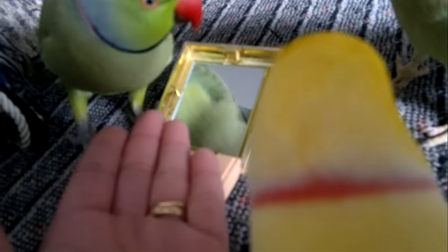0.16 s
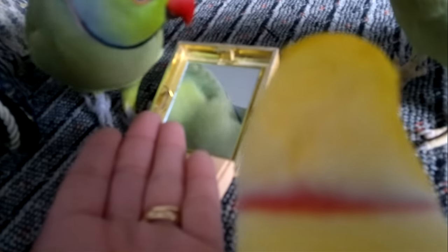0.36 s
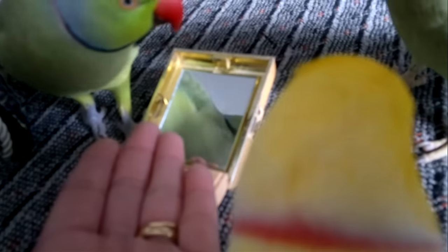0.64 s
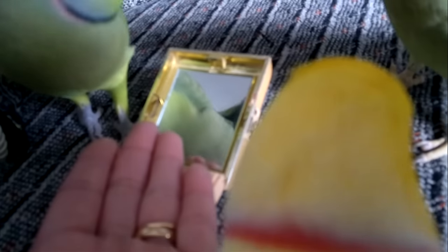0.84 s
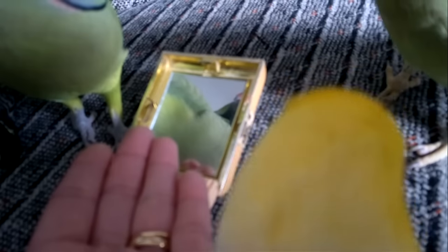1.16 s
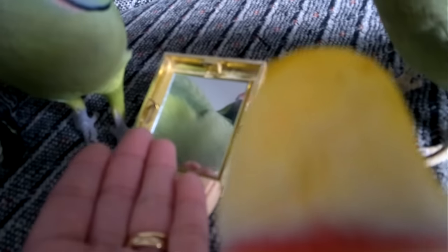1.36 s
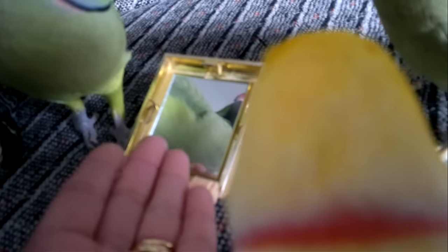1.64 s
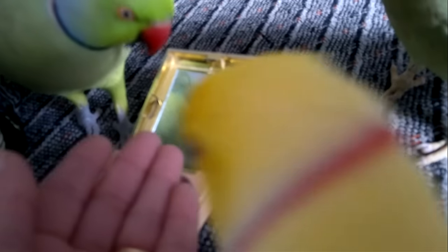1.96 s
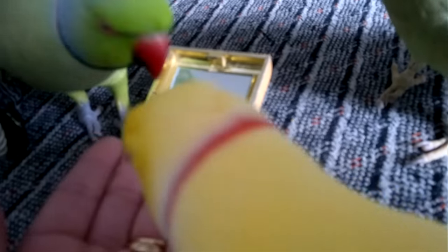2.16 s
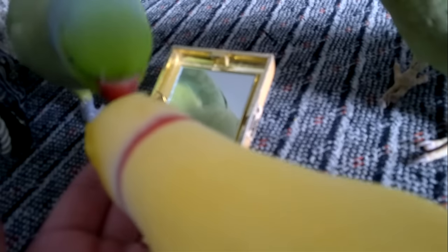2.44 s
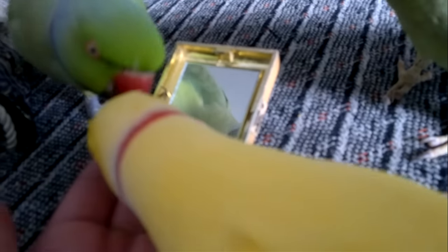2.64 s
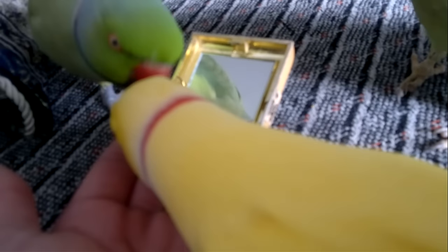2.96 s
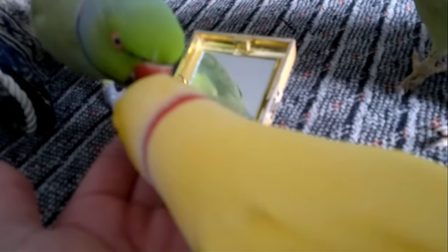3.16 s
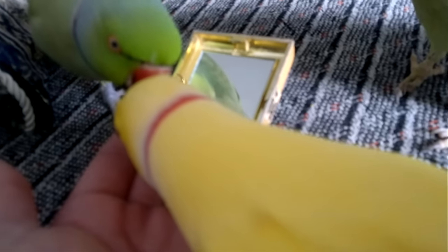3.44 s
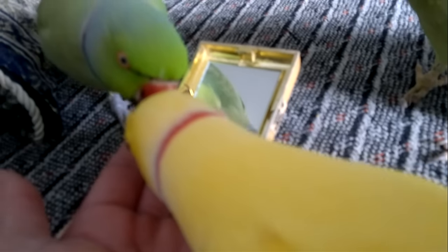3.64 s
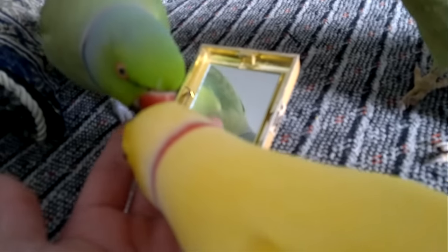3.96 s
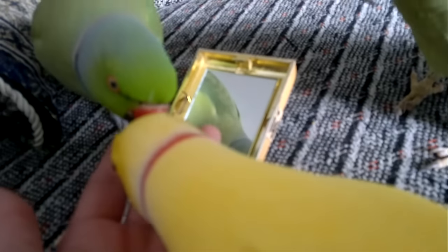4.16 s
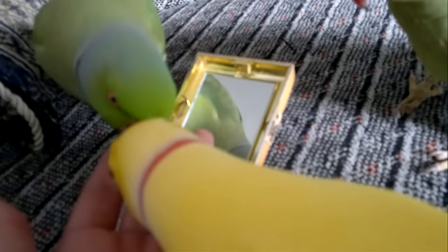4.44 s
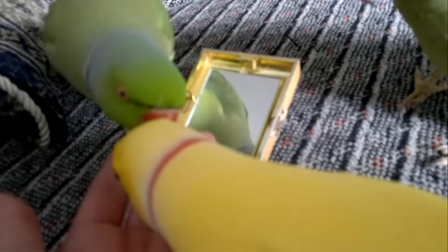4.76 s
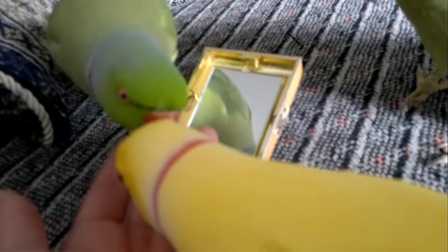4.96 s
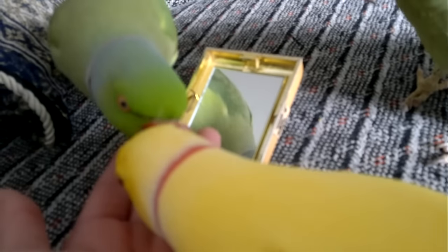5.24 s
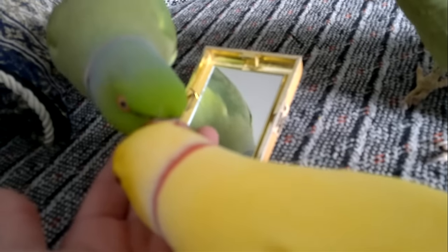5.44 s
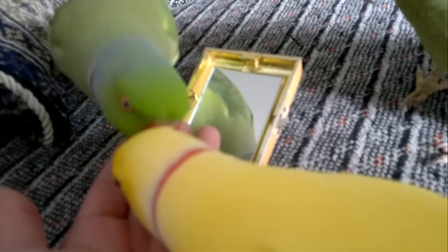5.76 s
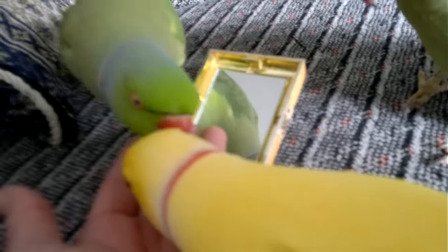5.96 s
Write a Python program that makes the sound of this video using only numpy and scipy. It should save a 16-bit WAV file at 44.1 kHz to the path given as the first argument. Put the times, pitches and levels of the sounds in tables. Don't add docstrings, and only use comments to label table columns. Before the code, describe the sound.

A quiet small carpeted room, heard closely in stereo, with low house hum, soft hiss and slight feather rustle, most noticeable around 0.3 s. From 0.5 to 2.5 s come very faint beak pecks, soft muffled taps and tiny throat blips; a thin, brief rising chirp at about 2600 Hz sounds further off at 1.4 s. A clear, sharp peck lands at 2.64 s. From 2.86 s a parrot near the left side clacks steadily, roughly every 0.22 s: each clack is a fast rattling flutter of tiny pulses, hollow and woody around 2 to 3 kHz, closing about 10 to 25 ms later in a snap, with bright dry crackle. Small ticks and scrapes fill gaps from 3.9 s, with a knock against the phone at 4.8 s. After 5.5 s the clacks are weaker and more muffled as the bird ducks behind a hand, the last faint at 6.07 s.

```python
import sys
import numpy as np
from scipy import signal
from scipy.fft import rfft, irfft, next_fast_len
from scipy.io import wavfile
from scipy.ndimage import uniform_filter1d, minimum_filter1d

SR = 44100
rng = np.random.default_rng(int(sys.argv[2]) if len(sys.argv) > 2 else 0)


def nominal_scale(level):
    x = np.asarray(level, float) / 20
    return 10 ** x


def store_pcm(level_fs):
    pcm = np.round(np.clip(level_fs, -1, 1) * 32767).astype(np.int16)
    wavfile.write(sys.argv[1], SR, np.atleast_2d(pcm).T)


N = 268701
LEAN_IN_S = 2.75
DUCK_S = 5.5

# frequency_hz, level_db
HUM_SPECTRUM = [(12, -37), (20, -0.5), (70, 1.5), (134, -8.5), (274, -11), (300, -18.5), (390, -34.5),
                (660, -120)]
# frequency_hz, level_db
SHUFFLE_SPECTRUM = [(88, -62.5), (180, -12.5), (270, -5), (360, -9), (700, -13), (1370, -22.5), (3500, -32),
                    (5500, -120)]
# frequency_hz, level_db
RUSTLE_SPECTRUM = [(1800, -16), (3000, -4), (5000, -2.5), (8000, -1), (11000, -3.5), (13500, -14),
                   (16000, -23)]
# frequency_hz, level_db
HISS_SPECTRUM = [(120, -37.5), (250, -14.5), (700, -2.5), (1500, -5.5), (2800, -11), (5000, -16),
                 (8000, -31), (16000, -40)]
# time_s, level_db
STIR_LEVEL = [(0, -64), (.17, -62), (.29, -54.5), (.44, -68.5), (.8, -75.5), (1.15, -68), (1.42, -76.5),
              (1.56, -70.5), (1.7, -74.5), (2.6, -77), (2.898, -71.5), (3.499, -82), (3.8, -79.5),
              (4.7, -74), (5.07, -81.5), (5.41, -79), (6.09, -72)]
# start_s, level_db, cavity_hz, knock_relative_db
LIGHT_PECKS = [(0.4846, -69.5, 2080, 14.5), (1.0012, -59, 2900, 1), (1.1935, -53, 2280, -19),
               (1.55, -38, 2250, -7), (2.1526, -70, 1910, -15), (2.1708, -41.5, 2480, -1),
               (2.348, -55.5, 2430, -8), (2.4755, -40, 2700, -2.7), (2.4809, -41.5, 2690, -5.5),
               (2.63, -44, 3130, -28.5), (2.6436, -16.5, 2577, -15), (2.6444, -25, 3340, -11),
               (2.7056, -43, 2400, -13), (2.743, -60.5, 2040, 2)]
# start_s, level_db, cavity_hz, knock_relative_db
RESET_TICKS = [(2.8278, -29.5, 2020, -7), (2.9828, -55.5, 2360, -21), (3.9507, -24.5, 2570, 0),
               (4.0402, -25, 2300, -13.5), (4.276, -30.5, 2010, -8.5), (4.3034, -23, 1910, -18.5),
               (4.4039, -25.5, 3640, -20), (4.418, -28, 3600, -9), (4.5224, -36, 2370, -4.5),
               (4.5551, -22, 2040, -13.5), (4.6296, -24, 2510, -2), (4.778, -44, 2270, 2.5),
               (4.7866, -27, 2240, -5.7), (4.8146, -25.5, 2145, -16.5), (4.8544, -14.5, 2750, -14.5),
               (5.0001, -30, 2204, -20), (5.0076, -25, 2250, -16), (5.0272, -25, 2050, -16),
               (5.2407, -39.5, 2190, -9.5), (5.4521, -50.5, 2240, 7), (5.5862, -29.5, 3100, -28.5),
               (5.7384, -49.5, 2590, -5)]
# start_s, start_to_snap_ms, first_db, middle_db, snap_db
BEAK_CLACKS = [(2.860, 22.7, -3, -25, -10), (3.059, 25.8, -2.5, -10, -3.5), (3.267, 20, -2.5, 2, 3.5),
               (3.478, 24.2, -8, 2, 0.5), (3.712, 13.6, -5.5, -6.5, 0.5), (3.927, 12.44, -6, -9.5, -1),
               (4.1504, 9.3, -13, -24, 3.5), (4.37, 12.1, -7.5, -13.5, -4.5), (4.602, 15.1, -4, -10.5, 0),
               (4.831, 12, -5.5, -3, -3), (5.0657, 14.5, -7, -10, -1.5), (5.297, 19.4, -10, 2, -3),
               (5.557, 13, -13, -27, -29.5), (5.8261, 7, -13.5, -29.5, -27),
               (6.073, 14.3, -26.5, -41.5, -33)]
# time_s, speed_hz_per_ms
BEAK_OPENING = [(3.9, 43), (4.2, 13), (5.1, 12.5), (5.3, 21)]
# time_s, resonance_hz, swell_db
THROAT_TUNING = [(2.7, 920, 0), (2.85, 640, 4.5), (3.5, 560, 3.5), (3.95, 580, 6.5), (4.2, 640, 2.5),
                 (5.1, 700, 1.5), (5.3, 640, 9), (5.55, 1314, 5.5), (5.82, 1619, 8)]
# time_s, centre_hz, level_db, lower_band_relative_db
CRACKLE_TURN = [(2.9, 10300, -14.5, -13), (3.1, 10000, -12, -10), (3.3, 10150, 4, 7.5),
                (3.7, 10550, 1.5, 7), (3.95, 10100, 6.5, 5), (4.2, 9800, -5, 5), (5.1, 9030, 1, 14),
                (5.3, 10500, 11.5, 16), (5.55, 7530, 7, 9)]
# start_s, level_db, swell_ms
SOFT_TAPS = [(.775, -58, 37), (1.055, -66, 45), (1.183, -57.5, 42), (1.38, -65.5, 50), (1.51, -58.5, 50),
             (1.652, -60.5, 43), (2.0, -56.5, 40), (2.757, -69, 22), (2.837, -74, 2.5), (3.02, -59.5, 16),
             (5.799, -57.5, 22), (5.835, -52, 23.6)]
# start_s, level_db, swell_ms
FEATHER_FLICKS = [(.9, -71.5, 39), (.999, -66.5, 55), (1.776, -74.5, 26), (2.262, -82, 11),
                  (2.391, -81, 23), (4.39, -67.5, 26), (4.62, -60, 12), (4.85, -74, 18), (5.78, -80, 11.7),
                  (6.01, -81, 5)]
# start_s, level_db, swell_ms
BEAK_SCRAPES = [(1.192, -60, 5), (1.545, -53, 6.5), (4.045, -51, 8.8), (4.279, -56.5, 12), (4.532, -59, 24),
                (4.784, -57, 11.5), (4.985, -51.5, 27.4), (5.24, -66.5, 7.4), (5.445, -58.5, 5.9),
                (5.562, -48, 22.6), (5.835, -55, 13)]
# start_s, level_db, swell_ms
PHONE_BUMPS = [
    (1.47, -57.5, 65),
    (1.6, -65.5, 97),
    (1.7, -65.5, 44),
    (3.928, -68.5, 9),
    (4.822, -37.5, 6.6),
]
# start_s, level_db, start_hz, end_hz, length_ms
THROAT_BLOOPS = [(0.787, -47.5, 387, 1066, 28.6), (1.052, -52, 1350, 1410, 62),
                 (1.11, -48.5, 970, 1070, 14), (1.511, -50, 2600, 2580, 10), (2.004, -70, 4700, 4750, 35),
                 (2.764, -67, 1380, 1330, 49), (2.878, -40.5, 1090, 1046, 27), (2.891, -35, 926, 1156, 7.9),
                 (3.025, -45, 1233, 1477, 78), (4.789, -42, 1085, 974, 12.6), (5.585, -38, 1045, 970, 6.4)]
# time_s, pitch_hz, level_db
CHIRP_PATH = [(1.375, 2490, -65.5), (1.385, 2545, -30), (1.397, 2610, -25), (1.408, 2615, -17.5),
              (1.415, 2620, -22), (1.427, 2685, -34.5), (1.44, 2750, -47.5)]
# multiple, level_db
CHIRP_OVERTONES = [(1, 9.5), (2, -10), (3, -29.5), (4, -78)]
# frequency_hz, level_db
PHONE_SHADOW = [(300, 3.5), (1000, 2), (1750, -1.5), (3200, -.5), (4000, 4), (5200, 14), (11300, 14),
                (13500, 4)]
# frequency_hz, share_of_lead
PHONE_DETOUR = [(300, 0.54), (600, 0.77), (1400, .55), (2100, 0.93)]
# frequency_hz, t60_s
ROOM_DECAY = [(300, .09), (800, 0.028), (1500, 0.25), (2100, 0.4), (2900, 0.22), (3800, 0.15), (5200, 0.15),
              (6500, 0.065)]
# frequency_hz, level_db
ROOM_TONE = [(300, -10.5), (1000, 16), (2300, -3), (3800, 5), (5300, 10.5), (6500, -8), (12000, -6.5)]


def along(points, hz):
    f, v = np.transpose(points)
    return np.interp(np.log(hz + 1), np.log(f + 1), v)


def at(table, s, column=1):
    columns = np.transpose(table)
    return np.interp(s, columns[0], columns[column])


def unit(x):
    return x / np.sqrt(np.mean(x ** 2) + 1e-20)


def filtered(x, response):
    n = x.shape[-1]
    m = next_fast_len(n + 1024)
    return irfft(rfft(x, m) * response(np.fft.rfftfreq(m, 1 / SR)), m)[..., :n]


def peak(f, hz, width_hz):
    return 1j * f * width_hz / (hz * hz - f * f + 1j * f * width_hz)


def add(track, s, x):
    part = track[round(s * SR):][:len(x)]
    part += x[:len(part)]


def rush(spectrum, alike, patchy_db):
    z = signal.stft(rng.standard_normal((2, N + 512)), nperseg=512)[2]
    field = rng.standard_normal(z.shape[1:])
    field = uniform_filter1d(uniform_filter1d(field, 8, 0), 6, 1)
    patchy = signal.istft(z * nominal_scale(patchy_db * unit(field)), nperseg=512)[1][:, :N]
    a, b = filtered(patchy, lambda hz: nominal_scale(along(spectrum, hz)))
    turn = np.arccos(np.clip(alike, -1, 1)) / 2
    middle, side = np.cos(turn) * a, np.sin(turn) * b
    return unit(np.array([middle + side, middle - side]))


def air():
    stir_db = at(STIR_LEVEL, np.arange(N) / SR)
    above_rest_db = stir_db + 78.5
    hum = nominal_scale(-69 + 0.53 * above_rest_db) * rush(HUM_SPECTRUM, alike=0.64, patchy_db=0.5)
    shuffle = nominal_scale(stir_db + 1.5) * rush(SHUFFLE_SPECTRUM, alike=0.2, patchy_db=2.5)
    rustle = nominal_scale(-82 + 0.67 * above_rest_db) * rush(RUSTLE_SPECTRUM, alike=0.1, patchy_db=3.5)
    hiss = nominal_scale(-73.5) * rush(HISS_SPECTRUM, alike=0.3, patchy_db=1.5)
    return (hum + shuffle + rustle) * nominal_scale([[1.5], [-1.5]]) + hiss


def flutters():
    rows = []
    for s, db, hz, knock_db in LIGHT_PECKS + RESET_TICKS:
        ms = 2.2 if s < LEAN_IN_S else 3.73
        rows.append((s, db, hz, ms, knock_db, 7))
    shut_hz, wide_hz = 2252, 3250
    for s, span_ms, first_db, middle_db, snap_db in BEAK_CLACKS:
        steps = [
            (0, first_db, 6.02, 5.5),
            (0.43 * span_ms, middle_db, 0.36 * span_ms, -5),
            (span_ms, snap_db, 4.95, 3.5),
            (span_ms + 4.8, snap_db - 16, 5.5, -13)]
        turn_db = at(CRACKLE_TURN, s, 2)
        swell_db = at(THROAT_TUNING, s, 2)
        for after_ms, db, ms, dry_db in steps:
            hz = min(shut_hz + at(BEAK_OPENING, s) * after_ms, wide_hz)
            knock_db = -26 - 0.32 * db + swell_db + 10.5 * (s > DUCK_S)
            rows.append((s + after_ms / 1000, db, hz, ms, knock_db, dry_db + turn_db))
    return rows


def pulse_train(ms, chance, pulse_hz, jitter, scatter_db, length):
    rate_hz = pulse_hz * (1 + 0.092 * chance[2, 0])
    times = 0.013 + (np.arange(-6, 6) + 1 + jitter * chance[0]) / rate_hz
    size = np.exp(-(1.67 * (times - 0.012) / (ms / 1000)) ** 4) * nominal_scale(scatter_db * chance[1])
    places = np.clip(np.round(times * SR).astype(int), 0, length - 1)
    return np.bincount(places, size, length)


def beak_cavity(train, hz, width_hz, turned):
    lower = 0.79 if turned else 1

    def response(f):
        inner = peak(f, hz * lower, 1.22 * width_hz) - 0.3 * turned * peak(f, 4040, 2100)
        return peak(f, hz, width_hz) * inner * peak(f, 3090, 3100) / (1 + 1j * f / 5200) ** 2
    return filtered(train, response)


def throat_knock(train, s, db, width_hz, turned):
    hz = np.interp(db, [-31, -24], [1000, at(THROAT_TUNING, s)])

    def response(f):
        inner = peak(f, hz, 0.91 * width_hz) - 1.03 * turned * peak(f, 1300, 740)
        return inner * peak(f, hz, 1100 if turned else width_hz)
    return filtered(train, response)


def dry_crackle(train, s):
    t = np.arange(len(train)) / SR
    fade = nominal_scale(-60 * t[:400] / 0.0041)
    burst = np.convolve(train, fade)[:len(t)] * rng.standard_normal(len(t))
    hz, lower_db = at(CRACKLE_TURN, s, 1), at(CRACKLE_TURN, s, 3)
    return filtered(burst, lambda f: peak(f, hz, 2900) ** 3 + nominal_scale(lower_db) * peak(f, 5300, 2800) ** 3)


def beak(pulse_hz, jitter, scatter_db, cavity_width_hz):
    out = np.zeros(N)
    for s, db, hz, ms, knock_db, dry_db in flutters():
        chance = rng.standard_normal((3, 12))
        turned = s > LEAN_IN_S
        width_hz = cavity_width_hz if turned else 380
        crackle_db = dry_db - 47 - 0.39 * db - 0.5 * chance[2, 1]
        train = pulse_train(ms, chance, pulse_hz, jitter, scatter_db, SR // 25)
        sounds = (beak_cavity(train, hz, width_hz, turned),
                  throat_knock(train, s, db, width_hz, turned),
                  dry_crackle(train, s))
        cavity, knock, crackle = [x / np.abs(x).max() for x in sounds]
        flutter = cavity + nominal_scale(knock_db) * knock + nominal_scale(crackle_db + 9) * crackle
        add(out, s - 0.0132, nominal_scale(db + 0.76) * flutter)
    return out


def taps(events, hz, width_hz):
    out, t = np.zeros(N), np.arange(SR // 4) / SR
    for s, db, ms in events:
        u = t / (ms / 1000) * 1.42
        swell = u ** 0.75 * np.exp(-u ** 1.204)
        noise = rng.standard_normal(len(t))
        noise = unit(filtered(noise, lambda f: peak(f, hz, 1.2 * width_hz) ** 4))
        add(out, s, nominal_scale(db + 13) * swell * noise)
    return out


def bloops():
    out = np.zeros(N)
    for s, db, start_hz, end_hz, ms in THROAT_BLOOPS:
        u = np.linspace(0, 1, round(ms * SR / 1000))
        phase = 2 * np.pi * np.cumsum(start_hz + (end_hz - start_hz) * u) / SR
        add(out, s, nominal_scale(db) * np.sin(np.pi * u) * np.sin(phase))
    return out


def chirp():
    s, hz, db = np.transpose(CHIRP_PATH)
    t = np.arange(N) / SR
    pitch_hz = uniform_filter1d(np.interp(t, s, hz), size=220)
    phase = 2 * np.pi * np.cumsum(pitch_hz) / SR
    tone = sum(nominal_scale(level) * np.sin(k * phase + k) for k, level in CHIRP_OVERTONES)
    rasp = filtered(rng.standard_normal(N), lambda f: peak(f, 10000, 6000) ** 3 + 3 * peak(f, 1600, 700) ** 3)
    waver = unit(filtered(rng.standard_normal(N), lambda f: peak(f, 120, 300) ** 4))
    loudness = uniform_filter1d(nominal_scale(np.interp(t, s, db, left=-120, right=-120)), size=220)
    return loudness * (tone * (1 + 0.15 * waver) + nominal_scale(-35.5) * unit(rasp))


def ports(x, lead_ms, shadow):
    side = np.array([[1], [-1]])

    def response(hz):
        shade = nominal_scale(side * shadow * along(PHONE_SHADOW, hz) / 2)
        lead_s = along(PHONE_DETOUR, hz) * lead_ms / 1000
        return shade * np.exp(1j * np.pi * side * hz * lead_s)
    return filtered(x, response)


def room(x, wet_db):
    out, step = np.zeros((2, N + SR)), SR // 4
    for start in range(0, N, step):
        hz, t, z = signal.stft(rng.standard_normal((2, SR // 2)), SR, nperseg=128)
        tail_db = -60 * t / along(ROOM_DECAY, hz)[:, None] + along(ROOM_TONE, hz)[:, None]
        tail = signal.istft(z * nominal_scale(tail_db), SR, nperseg=128)[1]
        age = np.arange(tail.shape[1]) / SR
        tail = tail * (1 - np.exp(-age / 0.001)) * nominal_scale(-6 * (age / 0.165) ** 4)
        tail = tail / np.linalg.norm(tail[0])
        wet = signal.fftconvolve(x[None, start:start + step], tail, axes=1)
        out[:, start:start + wet.shape[1]] += wet
    return nominal_scale(wet_db) * out[:, :N]


def scene():
    background = air()
    near = beak(pulse_hz=620, jitter=0.26, scatter_db=3, cavity_width_hz=620)
    early = near * (np.arange(N) < LEAN_IN_S * SR)
    far = taps(SOFT_TAPS, hz=1728, width_hz=1100) + bloops()
    far += taps(FEATHER_FLICKS, hz=7220, width_hz=9160) + taps(BEAK_SCRAPES, hz=2400, width_hz=4300)
    whistle = chirp()
    left_bumps = taps(PHONE_BUMPS, hz=85, width_hz=249)
    right_bumps = nominal_scale(-3) * taps(PHONE_BUMPS, hz=85, width_hz=249)
    bumps = np.array([left_bumps, right_bumps])
    direct = ports(near - early, lead_ms=0.26, shadow=1) + ports(early, lead_ms=0.054, shadow=0.65)
    direct += ports(whistle, lead_ms=0.19, shadow=0.67) + ports(far, lead_ms=0.074, shadow=0.8)
    behind_hand = np.where(np.arange(N) < DUCK_S * SR, 1, nominal_scale(-5.5))
    to_walls = near * behind_hand + nominal_scale(-4) * far + nominal_scale(-10) * whistle
    return direct + room(to_walls, wet_db=-19) + bumps + background


def roll_off(x):
    return signal.sosfilt(signal.butter(12, 15950, fs=SR, output="sos"), x)


def record(dry):
    bent = nominal_scale(-1) * dry + nominal_scale(-35.5) * dry ** 2
    needed = np.minimum(1, 0.99 / (np.abs(bent).max(axis=0) + 1e-9))
    gain = uniform_filter1d(minimum_filter1d(needed, size=161), size=81)
    return roll_off(bent * gain)


dry = scene()
out = record(dry)
store_pcm(out)
```